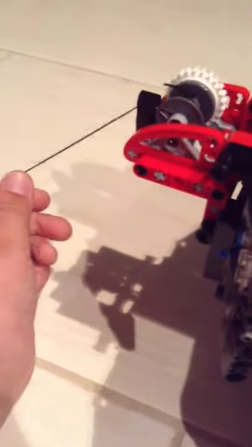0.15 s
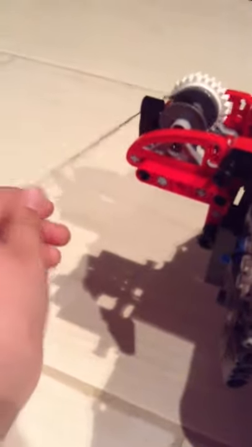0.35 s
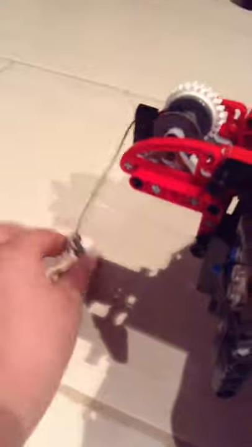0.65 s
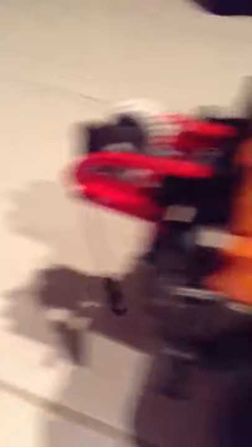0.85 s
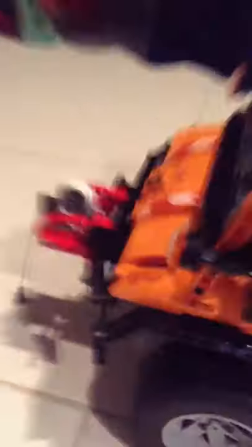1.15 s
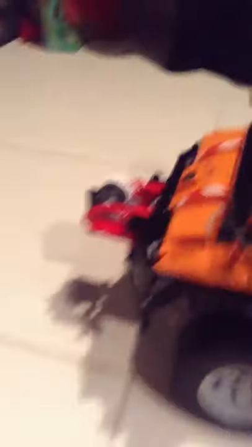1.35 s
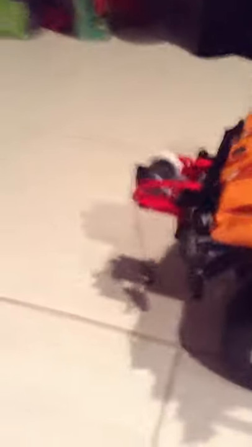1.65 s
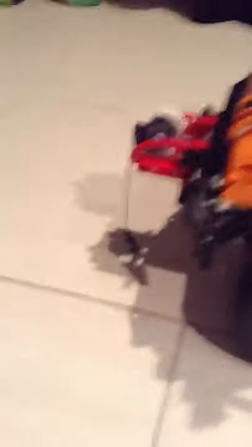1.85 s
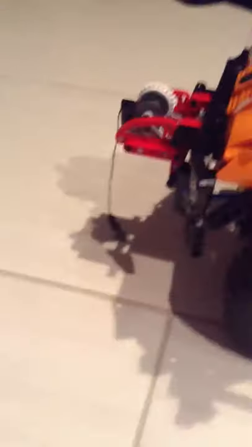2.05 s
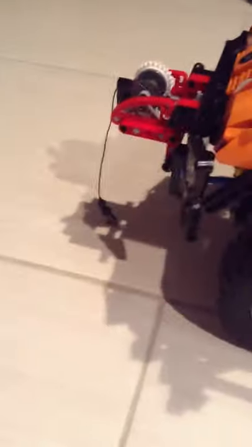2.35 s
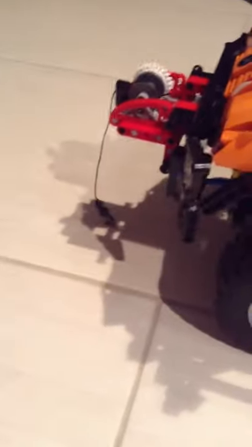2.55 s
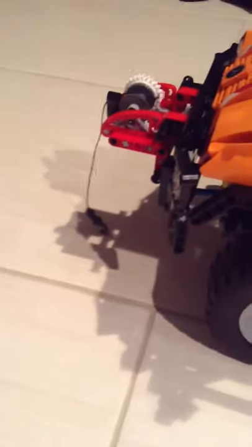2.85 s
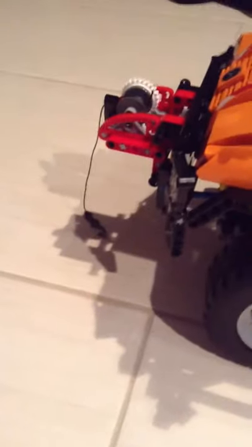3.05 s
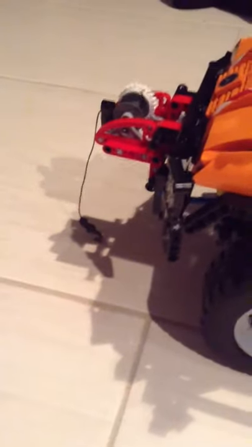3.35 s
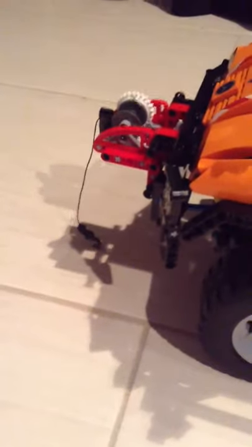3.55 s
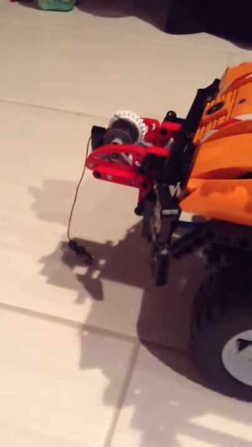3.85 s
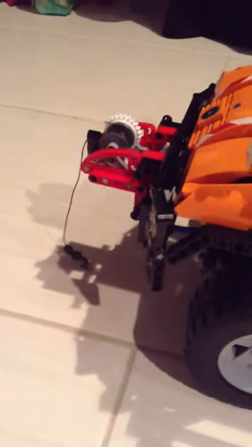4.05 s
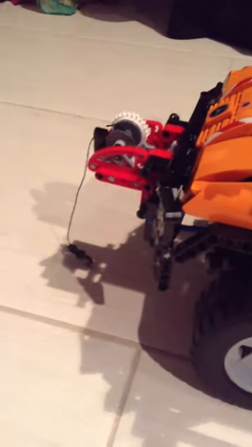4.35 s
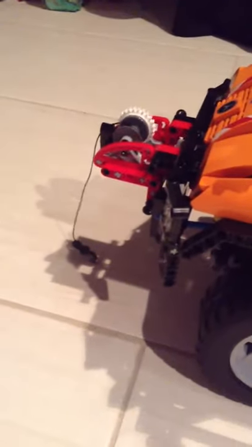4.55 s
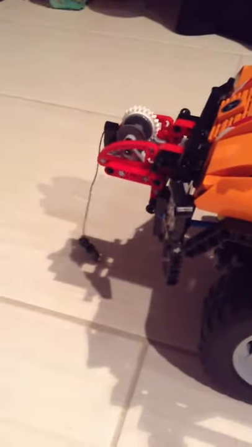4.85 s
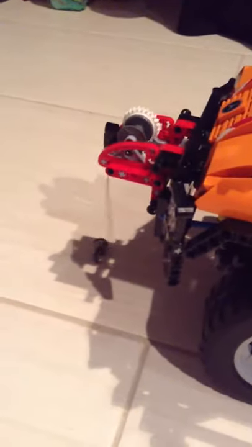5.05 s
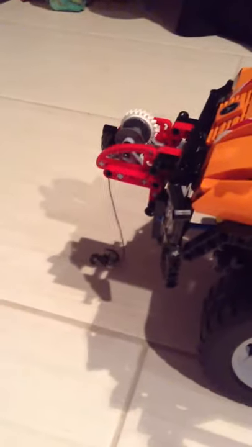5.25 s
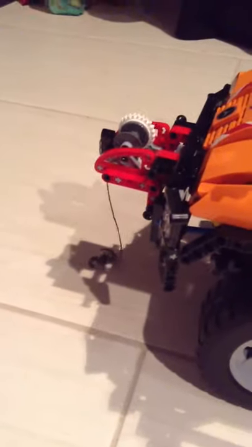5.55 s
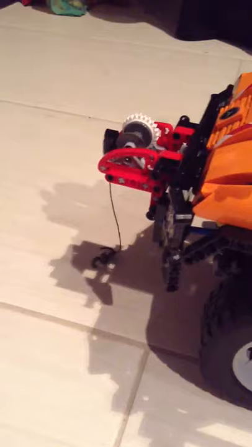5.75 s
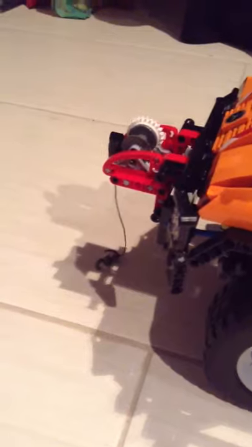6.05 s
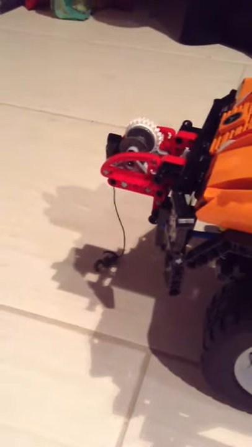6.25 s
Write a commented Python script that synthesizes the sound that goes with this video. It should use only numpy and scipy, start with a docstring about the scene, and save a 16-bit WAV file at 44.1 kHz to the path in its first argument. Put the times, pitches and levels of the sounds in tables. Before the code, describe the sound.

Indoors, close to a handheld phone, a small electric motor whirs through rattling plastic gears. Fast tooth clicks blur into a harsh treble buzz that throbs slightly with the turning shaft, over a weak rumble. Thin whines waver inside it. The colour changes as the phone moves sideways and then back, with two light low knocks on its case; afterwards the steady whir continues, slightly rougher near the end, without stopping.

```python
"""Toy winch with an electric motor

A small motor turns a toy winch through plastic gears, close to a handheld phone.
Teeth and brushes rattle densely: noise that throbs with the shafts, knocks tooth by tooth and is coloured
by the housing. Rotor and gear meshes whine thinly (wavering sines) above a low rumble (filtered noise).
The phone swings past the toy and backs off, so colour and level change; two light bumps push on it.
"""
import sys
import numpy as np
from scipy import signal
from scipy.fft import rfft, irfft
from scipy.io import wavfile
from scipy.ndimage import uniform_filter1d

SR = 44100
rng = np.random.default_rng(int(sys.argv[2]) if len(sys.argv) > 2 else 0)


def volts_from_db(level):
    """Convert decibel levels to linear amplitude ratios."""
    exponent = np.asarray(level, float) / 20
    return 10 ** exponent


def persist_wave(psi):
    """Save psi, clipped to +-1, as 16-bit WAV."""
    counts = np.round(np.clip(psi, -1, 1) * 32767).astype(np.int16)
    wavfile.write(sys.argv[1], SR, np.atleast_2d(counts).T)


N = 281799

SHAFT_HZ = 6.156  # turns a second of the geared output shaft
# Moves of the phone, near to sideways and then sideways to far: (start t/s, end t/s)
MOVES = [(.75, 1.05), (1.3, 1.8)]


def read(points, hz):
    """Reads a table of (f/Hz, value) between its points, on a log frequency axis."""
    f, value = np.transpose(points)
    return np.interp(np.log(hz + 1), np.log(f + 1), value)


def evened(x):
    """Scales a signal to rms 1."""
    return x / np.sqrt(np.mean(x ** 2))


def drift(rate_hz):
    """Random wandering of rms 1: noise with only the changes up to about rate_hz left in."""
    b, a = signal.butter(2, rate_hz, fs=SR)
    settled = signal.lfilter(b, a, rng.standard_normal(N + SR))[SR:]
    return evened(settled)


def lift(hz, centre_hz, width_hz, db):
    """A bell-shaped lift in dB around one ring; width_hz is measured at half the lift."""
    return db / (1 + (2 * (hz - centre_hz) / width_hz) ** 2)


def rumble(near_db=1.5, twice_a_turn=0.14):
    """Low noise ringing in the frame, swelling twice a shaft turn and a little stronger when near."""
    # Rumble of housing and room through a thin microphone: (f/Hz, relative level/dB per Hz)
    rumble_colour = [(15, -81), (25, -51), (91, -31.5), (118, -36), (140, -25.5), (172, -26), (202, -20.5),
                     (274, -19.5), (376, -15), (573, -3), (682, -3), (800, -4.5), (1040, -33), (1760, -120)]
    # Low rings of the frame: (f/Hz, width/Hz, lift/dB)
    low_rings = [(107, 8, 4), (149, 8.6, 6.5), (208, 19, 7.5), (582, 22, 7), (767, 27, 6.5)]
    level_db = -59.5  # rms once the phone is away, before the swell
    hz, time = np.fft.rfftfreq(N, 1 / SR), np.arange(N) / SR
    colour_db = read(rumble_colour, hz) + sum(lift(hz, *ring) for ring in low_rings)
    spectrum = rfft(rng.standard_normal(N)) * volts_from_db(colour_db) * (hz < 850)
    noise = evened(irfft(spectrum, N))
    swell = 1 + twice_a_turn * np.cos(2 * np.pi * (2 * SHAFT_HZ * time - .25))
    nearness = np.interp(time, MOVES[0], [1, 0])
    return volts_from_db(level_db + near_db * nearness) * noise * swell


def bumps(cycles=0.48):
    """Short low pushes through the case of the phone, thinned by its microphone."""
    # Dull knocks on the phone: (t/s, envelope peak level/dB before thinning, f/Hz)
    pushes = [(1.872, -52, 420), (2.255, -48, 215)]
    out, t = np.zeros(N), np.arange(3000) / SR
    for start_s, db, hz in pushes:
        age = t * hz / cycles  # the push is strongest at age 1, after this many cycles
        push = volts_from_db(db) * age * np.exp(1 - age) * np.sin(2 * np.pi * hz * t)
        out[round(start_s * SR):][:len(t)] += push
    thinning = signal.butter(4, 145, "highpass", fs=SR, output="sos")
    return signal.sosfilt(thinning, out)


def speed_percent():
    """Motor speed off its reference: a slow gear binds at the same spots every turn, and the speed sags."""
    # Multiples of the slow gear's turn
    bind_orders = [1, 2, 3, 4, 6, 8]
    # Speed change at each of these orders: (depth/% of speed, phase/turns)
    binds_table = [(0.261, -0.2696), (.13, 0.351), (0.26, -.05), (0.16, .24), (.14, -0.035), (0.098, .2)]
    shaft_turns_per_slow_turn = 8
    sag_percent_per_s, no_sag_s = .05, 2.5  # the sag passes zero at no_sag_s
    time = np.arange(N) / SR
    turns = time * SHAFT_HZ / shaft_turns_per_slow_turn
    binds = np.zeros(N)
    for order, (depth, phase) in zip(bind_orders, binds_table):
        binds += depth * np.cos(2 * np.pi * (order * turns + phase))
    return binds - sag_percent_per_s * (time - no_sag_s)


def whines(waver=.0013, flicker=.33):
    """Tones that all follow the motor speed, each shivering with the play of its teeth."""
    # Whines of rotor and gear meshes at the reference speed: f/Hz
    whine_hz = [443, 588, 890, 1269, 1920, 2088, 2223, 2530, 2630, 3897, 4453, 5155]
    # Their rms before the flicker: (near level/dB, sideways level/dB, far level/dB)
    whine_levels = [(-75.5, -79, -80.5), (-86, -74, -75.5), (-60, -71, -69.5), (-62, -61.5, -65),
                    (-55.5, -56.5, -53), (-65, -68, -69), (-60, -57, -59.5), (-55, -53, -55),
                    (-53, -46.5, -52), (-51, -55, -54), (-62, -66, -53), (-57, -68, -64)]
    # s added to each start and end of a move: the motor faces the phone a little longer than the gears
    linger = np.array([.1, 0.048, 0.19, .35])
    time, out = np.arange(N) / SR, np.zeros(N)
    speed = 1 + speed_percent() / 100
    for hz, (near_db, sideways_db, far_db) in zip(whine_hz, whine_levels):
        db = np.interp(time, np.ravel(MOVES) + linger, [near_db, sideways_db, sideways_db, far_db])
        pitch_hz = hz * (speed + waver * drift(24.3))
        phase = 2 * np.pi * (np.cumsum(pitch_hz) / SR + rng.random())
        strength = (1 + flicker * drift(37)) * volts_from_db(1.1 * drift(5))  # fast flicker, slower wandering
        out += np.sqrt(2) * volts_from_db(db) * strength * np.sin(phase)
    return out


def tooth_knocks(first=0.694, spread_db=5.5, slack=0.15, ring_s=0.0036):
    """Envelope of one knock a tooth: uneven in strength and moment, quick rise, short ring."""
    teeth = 16  # on the gear of the output shaft
    teeth_hz = SHAFT_HZ * teeth
    count = int(N / SR * teeth_hz) - 1
    size, late = rng.standard_normal((count, 2)).T
    at = (np.arange(count) + first + slack * late) * SR / teeth_hz  # first and slack count tooth gaps
    train, t = np.zeros(N), np.arange(1500) / SR
    train[np.clip(at.astype(int), 0, N - 1)] = volts_from_db(spread_db * np.minimum(size, 1.4))  # strongest capped
    knock = (1 - np.exp(-t / 0.00034)) * np.exp(-t / ring_s)
    return signal.oaconvolve(train, knock)[:N]


def rattle_impacts(hiss, knock, spiky_db, flutter_db):
    """Shapes hiss into dense tooth and brush impacts that throb with the shafts and grow under strain."""
    # Multiples of the shaft turn; about 24 is the rotor
    throb_orders = [1, 2, 3, 4.92, 13.21, 24.07, 72.2]
    # Throb at each of these orders: (depth as a share, phase/turns)
    throbs = [(0.068, -0.4), (0.054, -0.079), (0.041, -0.25), (0.023, 0.0047), (0.042, -0.0018),
              (0.028, 0.22), (0.031, 0.21)]
    # Brief swells, perhaps teeth biting harder: (t/s, lift/dB before the grip in rattle())
    surges = [(0.24, 1.5), (0.343, 1), (0.555, 1.5), (0.715, 0), (1.024, 1), (1.19, 3.2), (1.317, 1),
              (1.476, 1), (3.319, 1), (3.813, 1.5), (5.09, 2.8), (5.267, 1.8), (5.426, 2.6), (5.748, 3.5),
              (5.926, 2.1)]
    surge_s = .036  # width of a swell, where its dB lift is down to 1/e
    strain_db_per_percent = 0.3  # the rattle grows as the motor labours
    time = np.arange(N) / SR
    turns = 2 * np.pi * SHAFT_HZ * time
    throb = np.ones(N)
    for order, (depth, phase) in zip(throb_orders, throbs):
        throb += depth * np.cos(order * turns + 2 * np.pi * phase)
    surge_db = sum(db * np.exp(-(2 * (time - s) / surge_s) ** 2) for s, db in surges)
    strain_db = -strain_db_per_percent * speed_percent()
    chance_db = spiky_db * drift(300) + flutter_db * drift(44)
    return hiss * (throb + knock * tooth_knocks()) * volts_from_db(surge_db + strain_db + chance_db)


def rattle(knock=0.31, spiky_db=0.68, flutter_db=0.16, patchy_db=0.98):
    """Dense impacts coloured by the housing, as heard from the three places of the phone."""
    # Colour of the rattle at each place of the phone: (f/Hz, relative level/dB per Hz)
    near = [(410, -49), (700, -25), (906, -14), (1090, -14.5), (1250, -13), (1560, -9.5), (2610, -7.5),
            (3420, -7.5), (4150, 0), (5240, -5), (6040, -1.5), (8020, -4.5), (9130, -11.5), (15300, -16)]
    sideways = [(410, -50), (700, -18), (1090, -15.5), (1280, -6.5), (1390, -8.5), (2320, -5), (2540, -4),
                (3050, -5), (3700, 1.5), (6120, -4), (7240, -1), (8020, -7), (13300, -12), (15300, -15)]
    far = [(410, -47), (700, -26), (747, -27.5), (838, -18), (1820, -10), (1940, -8.5), (2320, -10),
           (2570, -7.5), (3200, -8.5), (3890, -2), (4840, -6.5), (5800, -4), (10800, -15), (12900, -14.5),
           (15200, -17)]
    # Rings of the housing, below zero a dip: (f/Hz, width/Hz, near lift/dB, lift from sideways on/dB),
    # both lifts before the factor 0.75 below
    housing = [(895, 40, 3, 2), (1490, 60, 1, 3), (2500, 60, 2, 3), (3010, 120, 2, 3), (3560, 90, .5, 2),
               (3760, 80, .5, 2), (3900, 70, 1, 3), (4005, 70, 1, 3.5), (4450, 130, 1.5, 2.5),
               (5300, 70, 1, 3), (5850, 250, 1, 3), (6150, 220, 2, -3.5), (7330, 300, 1, 4),
               (8170, 120, 3, .1), (12550, 500, 1.4, 2.5), (13280, 250, .2, 2.5), (14150, 180, .2, 1.5),
               (14685, 90, 2, 2.5)]
    # How strongly each pitch takes on the unevenness of the impacts: (f/Hz, share)
    grip = [(500, 0.72), (1500, 0.43), (2600, 1.03), (4000, 1.78), (6000, 0.75), (9000, 0.6), (14000, 0.56)]
    # Treble of the rattle at the phone: (t/s, approximate level/dB)
    loudness = [(0.0, -34), (0.5, -34), (0.75, -34.5), (1.12, -34), (1.4, -36.5), (1.75, -37), (2.6, -36.5),
                (3.8, -36), (5.0, -36.4), (6.39, -36)]
    hiss = rng.standard_normal(N)
    impacts = evened(rattle_impacts(hiss, knock, spiky_db, flutter_db))
    hz, t, (even, uneven) = signal.stft([hiss, impacts], SR, nperseg=2048, noverlap=1792)
    z = even + read(grip, hz)[:, None] * (uneven - even)  # the teeth speak most in the middle treble

    first, second = (np.interp(t, move, [0, 1]) for move in MOVES)  # progress of each move
    colour_db = np.outer(read(near, hz), 1 - first)
    colour_db += np.outer(read(sideways, hz), first - second)
    colour_db += np.outer(read(far, hz), second)
    for ring_hz, width_hz, near_db, far_db in housing:
        ring_db = near_db + (far_db - near_db) * first
        colour_db += np.outer(lift(hz, ring_hz, width_hz, 0.75), ring_db)
    # power of the treble, so that the loudness table alone sets its level
    treble = volts_from_db(2 * colour_db[(hz > 5000) & (hz < 15000)]).sum(0) / len(hz)

    # small random patches in pitch and time
    patches = uniform_filter1d(rng.standard_normal(z.shape), size=16, axis=0)
    patches = uniform_filter1d(patches, size=12, axis=1)
    colour_db += patchy_db * evened(patches)
    colour_db -= 60 * np.clip(np.log2(760 / (hz + 1)), 0, 2)[:, None]  # the rumble takes over below
    level = volts_from_db(np.interp(t, *np.transpose(loudness))) / np.sqrt(treble)
    return signal.istft(z * volts_from_db(colour_db) * level, SR, nperseg=2048, noverlap=1792)[1][:N]


def scene():
    """All sources add up at one microphone, the same on both channels."""
    mix = rumble() + bumps() + whines() + rattle()
    return np.tile(mix, (2, 1))


def roll_off(x):
    """The treble ends steeply here."""
    return signal.sosfilt(signal.butter(12, 15380, fs=SR, output="sos"), x)


def record(dry):
    """A steep low-pass takes away what lies above about 15.3 kHz."""
    edge = signal.firwin(1023, 15290, window=("kaiser", 10), fs=SR)
    mix = signal.oaconvolve(dry, edge[None], "same")
    return roll_off(mix)


dry = scene()
out = record(dry)
persist_wave(out)
```